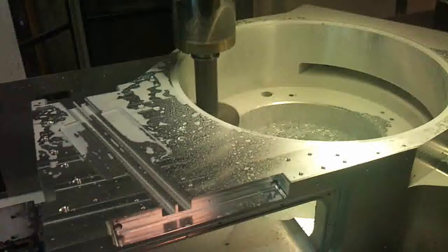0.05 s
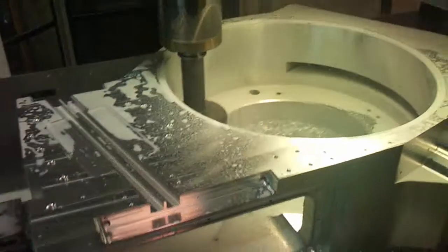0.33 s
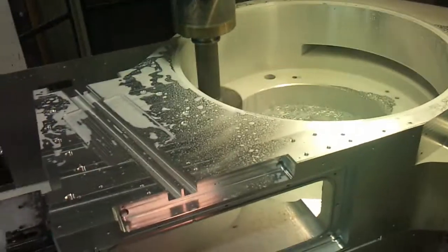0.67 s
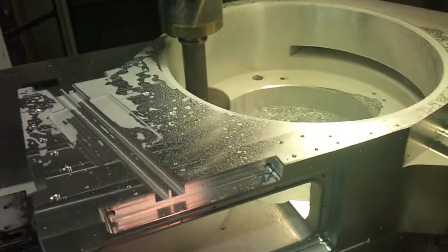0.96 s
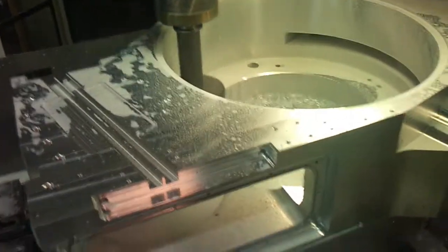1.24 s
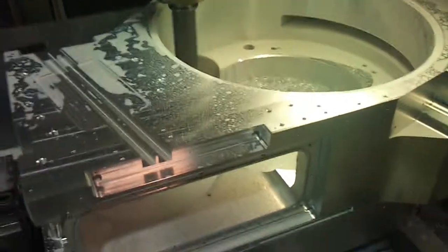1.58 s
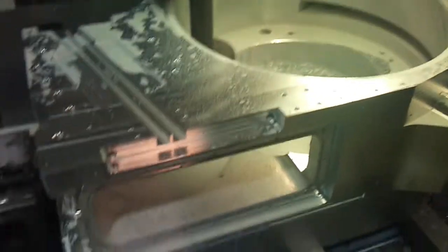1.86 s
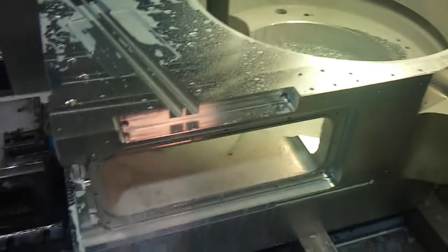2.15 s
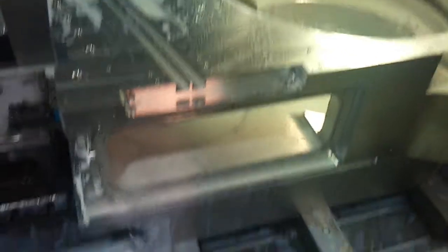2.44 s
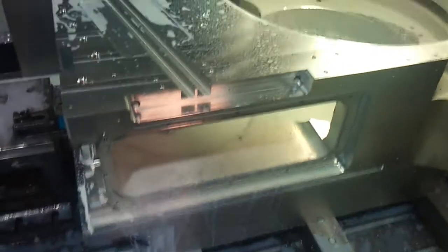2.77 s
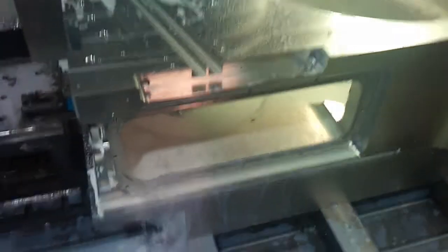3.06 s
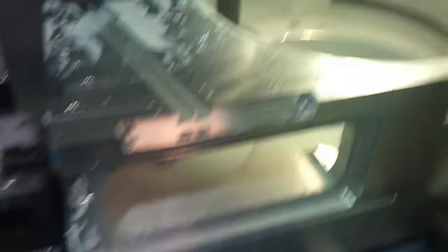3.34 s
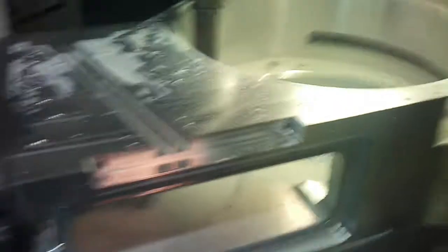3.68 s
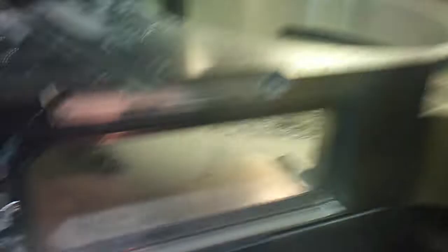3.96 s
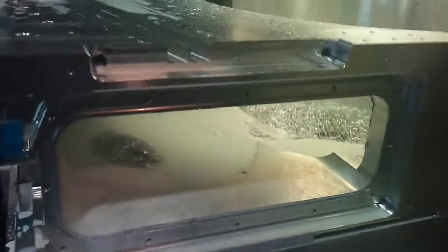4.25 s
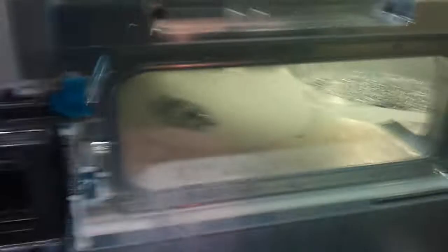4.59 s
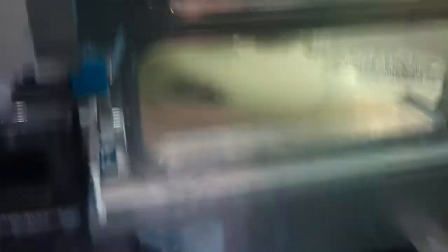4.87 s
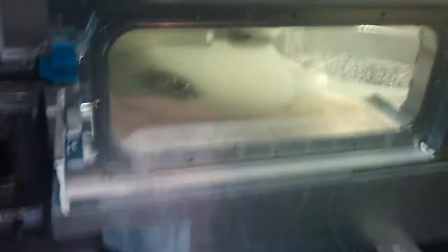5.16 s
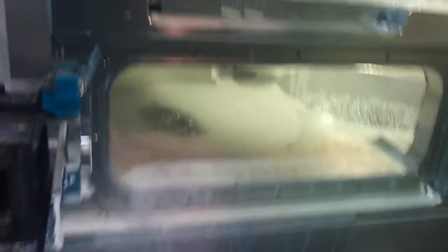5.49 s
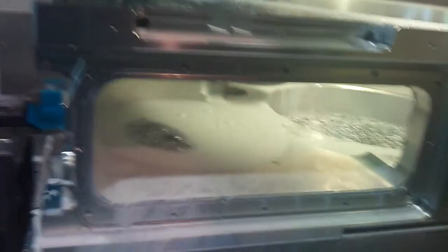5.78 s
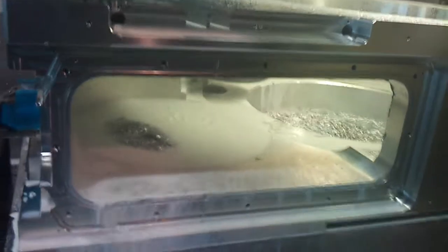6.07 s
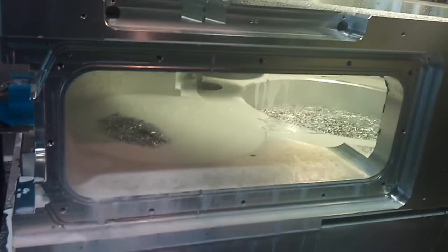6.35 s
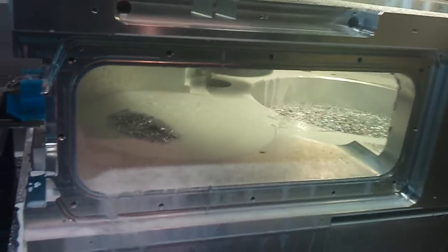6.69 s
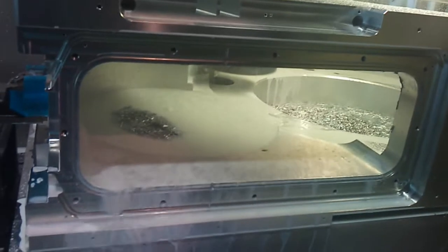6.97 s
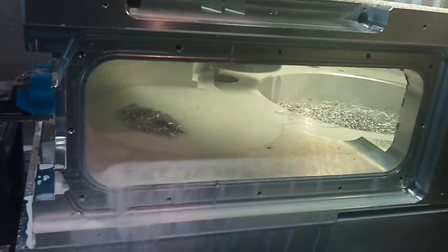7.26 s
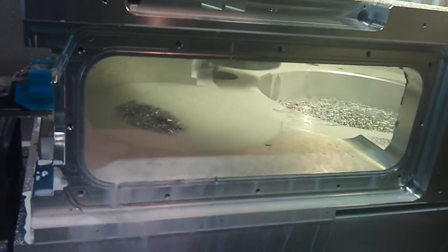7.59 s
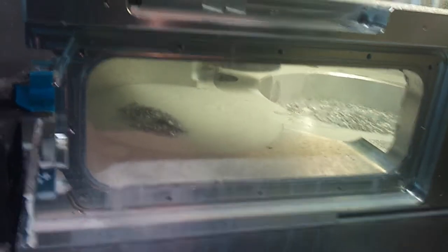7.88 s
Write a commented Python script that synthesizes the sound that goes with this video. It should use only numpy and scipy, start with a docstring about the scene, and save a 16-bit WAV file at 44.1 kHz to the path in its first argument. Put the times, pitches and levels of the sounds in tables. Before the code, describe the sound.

A milling machine sprays coolant into a hollow aluminium casting, making a steady, bright, sputtering hiss with a faint metallic ring. Liquid churns and splashes beneath it, over a low rumble, a slowly beating motor hum and a thin whine. Several short, hollow slaps of liquid cluster in the middle. The close microphone moves from above the casting down to a side opening, where the whine fades and the ringing changes colour.

```python
"""Coolant jet in a hollow casting

A milling machine sprays coolant into an aluminium casting, whose bore echoes and resonates. The jet
hisses and throbs with the pump, the pool churns, and slugs of liquid splash and slap on the metal.
Motors hum and beat underneath; their whine fades as the microphone moves down to a window in
the casting."""
import sys
import numpy as np
from scipy import signal
from scipy.fft import rfft, irfft, next_fast_len
from scipy.io import wavfile

SR = 44100
rng = np.random.default_rng(int(sys.argv[2]) if len(sys.argv) > 2 else 0)


def master(y):
    """Save y as 16-bit WAV."""
    cut = np.clip(np.atleast_2d(y).T, -1, 1)
    pcm = np.round(cut * 32767)  # scale
    wavfile.write(sys.argv[1], SR, pcm.astype(np.int16))


N = 358533
TIME = np.arange(N) / SR

# air resonances of the casting's bore: pitch_hz, bandwidth_hz, above_db, window_db
BORE_MODES = [(1910, 41, -14, -9), (2346, 51, -24.5, -5.5), (2750, 40, -11.5, -11), (3720, 77, -26, -6.5),
              (3850, 27, -26.5, -2.5), (4000, 52, -12, -14.5), (4415, 26, -1.5, -17), (4540, 37, -9.5, -2),
              (4950, 43, -29, -9.5), (5260, 48, -12, -10), (5950, 50, -8.5, -18.5)]


def coolant(gulp_db):
    """Common modulation: one swaying, sputtering jet drives spray, splash and pool together."""
    # first row: the splashing sounds brighter and louder during the opening fade-in; later rows: the
    # jet's surges (+) and lulls (-): middle_s, length_s, hiss_change_db, splash_change_db
    level_changes = [(0.856, 0.1, 1, 10), (1.163, 0.089, -3.5, -3), (1.47, 0.089, 1, 0.5),
                     (1.835, .08, 2, 6), (2.044, .06, 2.5, 2), (2.821, .03, 2.3, 0), (2.904, .04, 1, 5),
                     (3.091, .14, -2.8, -3), (3.31, .1, 1, 0), (3.446, .06, 1, 5), (3.57, .03, 3, 5),
                     (3.71, .09, -0.5, 4.5), (4.06, 0.11, 2, 4.5), (4.743, .07, 1.8, 3),
                     (4.865, .03, -0.5, 7.5), (4.994, .09, 0.5, 9), (5.12, 0.072, .5, 3),
                     (5.25, .09, -.5, -4), (5.534, 0.073, -2.5, -2), (5.634, .08, 3, 5),
                     (5.715, .05, 1.5, 7.5), (6.741, .12, 1.5, 3), (7.996, 0.033, 2.8, 5),
                     (8.073, .03, 1.5, 4.5)]
    hiss_db, splash_db = swells(level_changes)
    sputter = drift(34)
    flutter_db = 0.45 * np.sin(2 * np.pi * 12.95 * TIME)  # the jet wags
    stir_db = 0.19 * splash_db + gulp_db
    flow = (from_db(-24.2 + hiss_db + flutter_db) * spray(sputter)
            + from_db(-32.8 + splash_db) * splash(sputter)
            + from_db(-28.8 + stir_db) * churn(sputter))
    return flow * from_db(0.25 * drift(5.3))


def spray(sputter, vane_hz=122.5):
    """Amplitude modulation: the pump's vanes make the hiss of mist and ringing droplets throb faintly."""
    # spectrum of the hiss: frequency_hz, gain_db
    spectrum = [(1500, -16.5), (2600, -7), (3300, -4), (3850, -1), (4200, -1), (4480, -0.5), (4900, -2),
                (5700, -3), (6700, -3), (7200, -6), (7550, -12.5), (7950, -32), (8500, -23.5),
                (9100, -44.5)]
    mist = rng.standard_normal(N) + from_db(-7) * impacts(per_s=7000, spread_db=2.6)
    droplets = from_db(-6.5) * bubbles(3003, 7370, per_s=2400, cycles=25.5, spread_db=2.5)
    throb = 1 + 0.033 * np.sin(2 * np.pi * vane_hz * TIME)
    return coloured(mist + droplets, spectrum) * throb * from_db(sputter + 0.7 * drift(70))


def splash(sputter):
    """Impact noise: coarser drops break on the casting and ring briefly."""
    # spectrum of the splashing: frequency_hz, gain_db
    spectrum = [(700, -13), (1200, -1), (1600, -0.5), (2000, 1.5), (2600, -2), (3400, -5.5), (5000, -10),
                (7500, -33)]
    drops = bubbles(1020, 3890, per_s=1600, cycles=6.3, spread_db=1.0)
    wash = from_db(4.5) * rng.standard_normal(N)
    return coloured(drops + wash, spectrum) * from_db(1.1 * sputter)


def churn(sputter):
    """Air entrainment: the jet drives air into the pool, where large bubbles ring."""
    # spectrum of the pool: frequency_hz, gain_db
    spectrum = [(300, -8.5), (500, 2), (640, 0), (850, 0.5), (1030, 1), (1200, -4.5), (1400, -11.5),
                (2500, -30.5)]
    froth = bubbles(455, 1366, per_s=700, cycles=16, spread_db=4.0)
    wash = from_db(14) * rng.standard_normal(N)
    return coloured(froth + wash, spectrum) * from_db(0.77 * sputter)


def bubbles(low_hz, high_hz, per_s, cycles, spread_db, count=14):
    """Damped resonance: each impact rings one size of bubble, which decays 60 dB in `cycles`; rms 1."""
    clicks = impacts(per_s, spread_db)
    size_index = rng.integers(0, count, N)
    out = 0
    for k, hz in enumerate(np.geomspace(low_hz, high_hz, count)):
        radius = np.exp(-np.log(1000) * hz / (cycles * SR))
        ringing = resonator(clicks * (size_index == k) + 1e-18, hz, radius)
        out += np.sqrt(hz) * rms_one(ringing)
    return rms_one(out)


def impacts(per_s, spread_db):
    """Shot noise: drops land at random, most small and a few large; rms 1."""
    sizes = from_db(spread_db * np.minimum(rng.exponential(1, N), 4))
    signs = rng.choice([-1, 1], N)
    lands = rng.random(N) < per_s / SR
    return rms_one(sizes * signs * lands)


def casting(x, place):
    """Modal coupling: each resonance is heard with one strength from above and another at the window."""
    above_db, window_db = np.transpose(BORE_MODES)[2:]
    return (1 - place) * bore(x, above_db) + place * bore(x, window_db)


def bore(x, modes_db, echoes=16):
    """Reflection and cavity resonance: the metal walls return quick echoes and the enclosed air rings."""
    out = x.copy()
    for lag_s, sign in zip(rng.uniform(0.002017, 0.022, echoes), rng.choice([-1, 1], echoes)):
        out += sign * from_db(-24.5) * np.interp(TIME - lag_s, TIME, x, left=0)
    for (hz, bandwidth_hz, *_), db in zip(BORE_MODES, modes_db):
        radius = np.exp(-np.pi * bandwidth_hz / SR)
        out += from_db(db) * (1 - radius ** 2) / 2 * resonator(x, hz, radius)
    return rms_one(out) * np.std(x)


def blows():
    """Impulsive excitation: slugs slap the metal, each over a duller liquid plop; the cabinet thuds."""
    # slugs of coolant striking the metal: start_s, peak_db, pitch_hz
    slaps = [(2.894, -17, 1900), (3.2518, -8.5, 1600), (3.681, -7.5, 1510), (3.929, -10.5, 1790),
             (4.026, -11.5, 1300), (4.457, -11, 2900), (4.7003, -6.5, 1640), (4.869, -13, 2700),
             (4.872, -16, 1100), (5.624, -18, 1100), (5.963, -15, 1400), (7.219, -9, 2200)]
    # dull thuds in the cabinet: start_s, peak_db, pitch_hz
    thuds = [(2.82, -24.5, 112), (3.36, -27, 110), (4.2, -26, 120), (6.25, -24.5, 125)]
    plops = [(start_s, db - 7.5, hz * 0.52) for start_s, db, hz in slaps]
    return pops(slaps, rise_cycles=0.62) + pops(plops, rise_cycles=0.77) + pops(thuds, rise_cycles=2.7)


def pops(rows, rise_cycles):
    """Heavy damping: each blow makes a hollow pop that peaks after `rise_cycles` and soon dies."""
    out = np.zeros(N)
    for start_s, db, hz in rows:
        near = (TIME > start_s) & (TIME < start_s + 20 * rise_cycles / hz)
        cycles = hz * (TIME[near] - start_s)
        age = cycles / rise_cycles
        out[near] += from_db(db) * age * np.exp(1 - age) * np.sin(2 * np.pi * cycles)
    return out


def motors(place):
    """Superposition: hum, pump drone, whine and lesser tones add in a mix that varies with position."""
    # motors near the main motor's speed: offset_hz, relative_db, in_phase_s
    partners = [(-1.24, -3, 3.86), (3.14, -6, 3.96), (1.44, -7.5, 3.83)]
    # the drive's pure whine: time_s, level_db
    whine_levels = [(1.0, -38.5), (3.5, -36.5), (4.1, -44.5), (8.1, -48)]
    # steady tones of motors and drives: pitch_hz, above_db, window_db, wander_hz
    tones = [(56.9, -44, -44, 0.4), (60.8, -47, -46, 0.55), (133.8, -41, -32, .3),
             (152.8, -37.5, -49.5, 2.04), (238.6, -44, -35.5, 3), (284.2, -37, -38.5, 1.99),
             (349, -38, -40, 1.49), (356, -38, -36.5, 1), (773.5, -47, -38, .4), (1050, -55, -43.5, .6),
             (1071, -45, -42, 1), (1159, -37, -44, 0.23), (1340, -53, -54, .5)]
    whine_db, = in_time(whine_levels)
    out = beating(hz=175.2, db=-32.5, partners=partners, wander_hz=0.3) + pump(place)
    out += from_db(whine_db) * tone(hz=1400, wander_hz=0.19)
    for hz, above_db, window_db, wander_hz in tones:
        level_db = above_db + (window_db - above_db) * place
        waver_db = 1.88 * drift(3.0) - 0.75
        out += from_db(level_db + waver_db) * tone(hz, wander_hz)
    return out


def pump(place):
    """Interference: the pump's beating drone, weaker at the window, sounds under two wavering tones."""
    # drives that beat against the pump: offset_hz, relative_db, in_phase_s
    partners = [(-1.45, -2.5, 3.72), (-0.67, -7, 3.77)]
    # level curves of two wavering tones near 535 and 803 Hz: time_s, lower_db, upper_db
    tone_levels = [(0.98, -38, -37), (1.02, -26, -26), (1.1, -37.5, -34.5), (1.8, -32, -39),
                   (1.86, -39, -53), (1.92, -38, -30), (2.15, -37.5, -43), (2.85, -37, -35),
                   (3.03, -38, -46), (3.19, -36, -34.5), (5.5, -39.5, -44), (6.34, -34, -40),
                   (8.11, -40.5, -39), (8.13, -39, -46)]
    out = beating(hz=268.8, db=-34.5 - 3.5 * place, partners=partners, wander_hz=0.4)
    for hz, db in zip((535, 802.5), in_time(tone_levels)):
        out += from_db(db - 1) * tone(hz, wander_hz=2.2)
    return out


def beating(hz, db, partners, wander_hz):
    """Beats: motors on one supply wander together; small speed differences make the sum swell and sink."""
    turns = np.cumsum(hz + wander_hz * drift(2.45)) / SR + rng.random()
    out = np.sin(2 * np.pi * turns)
    for offset_hz, relative_db, in_phase_s in partners:
        out += from_db(relative_db) * np.sin(2 * np.pi * (turns + offset_hz * (TIME - in_phase_s)))
    return np.sqrt(2) * from_db(db) * out


def tone(hz, wander_hz):
    """Frequency modulation: a sine whose pitch wanders a little; rms 1."""
    turns = np.cumsum(hz + wander_hz * drift(2.48)) / SR
    return np.sqrt(2) * np.sin(2 * np.pi * turns + rng.uniform(0, 2 * np.pi))


def cabinet(gulp_db):
    """Forced vibration: the cabinet rumbles, more strongly when the pool gulps air."""
    # spectrum of the rumble: frequency_hz, gain_db
    spectrum = [(15, -13), (35, -11.5), (58, -4.5), (78, -7), (115, 1), (145, -2.5), (200, -3), (255, 4),
                (310, -2), (380, -2), (470, -6), (650, -17.5), (1500, -34.5)]
    return from_db(-27 + gulp_db + 0.7 * drift(8)) * coloured(rng.standard_normal(N), spectrum)


def resonator(x, hz, radius):
    """Two-pole resonance: the nearer the pole radius is to 1, the longer it rings."""
    return signal.lfilter([1, 0, -1], [1, -2 * radius * np.cos(2 * np.pi * hz / SR), radius ** 2], x)


def coloured(x, spectrum):
    """Spectral shaping, with a fall of 24 dB per octave past the last point; rms 1."""
    hz, db = np.transpose(spectrum)
    size = next_fast_len(N)
    bins_hz = np.maximum(np.arange(size // 2 + 1) * SR / size, 1)
    gain = from_db(np.interp(np.log(bins_hz), np.log(hz), db))
    rolloff = np.minimum(hz[-1] / bins_hz, 1) ** 4
    return rms_one(irfft(rfft(x, size) * gain * rolloff, size)[:N])


def drift(corner_hz):
    """Low-passed noise: smooth random motion of spread 1."""
    hop, settle = 40, 2000
    pole = np.exp(-2 * np.pi * corner_hz * hop / SR)
    noise = rng.standard_normal(N // hop + settle + 2)
    slow = signal.lfilter([1], [1, -2 * pole, pole ** 2], noise)[settle:]
    return np.interp(np.arange(N) / hop, np.arange(len(slow)), rms_one(slow))


def swells(rows):
    """Gaussian envelopes, one a row, summed into a curve in dB for each level column."""
    out = np.zeros((len(rows[0]) - 2, N))
    for middle_s, length_s, *change_db in rows:
        near = np.abs(TIME - middle_s) < 2 * length_s
        bell = np.exp(-(2 * (TIME[near] - middle_s) / length_s) ** 2)
        out[:, near] += np.outer(change_db, bell)
    return out


def in_time(rows):
    """Linear interpolation of each column at every sample."""
    times_s, *columns = np.transpose(rows)
    return [np.interp(TIME, times_s, column) for column in columns]


def from_db(db):
    """Decibels to amplitude ratio."""
    return 10 ** (np.asarray(db) / 20)


def rms_one(x):
    """Normalisation to unit power."""
    return x / np.sqrt(np.mean(x ** 2) + 1e-20)


def scene():
    """Source and filter: the coolant sounds through the casting, beside the blows and the machine."""
    # microphone position, 0 above the casting to 1 at its window: time_s, place
    path = [(1.0, 0.12), (3.5, 0.051), (4.2, 0.82), (8.1, 1)]
    # the pool gulps air (+) or settles (-): middle_s, length_s, change_db
    gulps = [(0.94, .06, 3), (1.43, .08, 3), (2.05, .08, 2), (2.82, .12, 2), (3.1, .16, -3),
             (3.68, .12, 1.5), (4.78, .16, 1.5), (5.48, .2, -2), (5.7, .1, 2), (6.15, .14, 2.5),
             (6.38, .1, 2), (7.7, .12, 1.5)]
    place, = in_time(path)
    gulp_db, = swells(gulps)
    return (casting(coolant(gulp_db), place) + blows() + motors(place) + cabinet(gulp_db))[None]


def record(dry, start_s=0.812, rise_s=0.0046, cutoff_hz=9076):
    """Gating and band limiting: the microphone opens quickly and fades in; the top treble is cut."""
    # fade-in of the microphone: time_s, gain_db
    fade_in = [(0.812, -14.5), (0.89, -8.5), (0.93, -4.5), (0.97, -5.5), (1.01, 0.5)]
    fade_db, = in_time(fade_in)
    gate = np.clip((TIME - start_s) / rise_s, 0, 1)
    low_pass = signal.ellip(10, 0.1, 80, cutoff_hz, fs=SR, output="sos")
    return signal.sosfilt(low_pass, dry * from_db(fade_db) * gate)


dry = scene()
out = record(dry)
master(out)
```